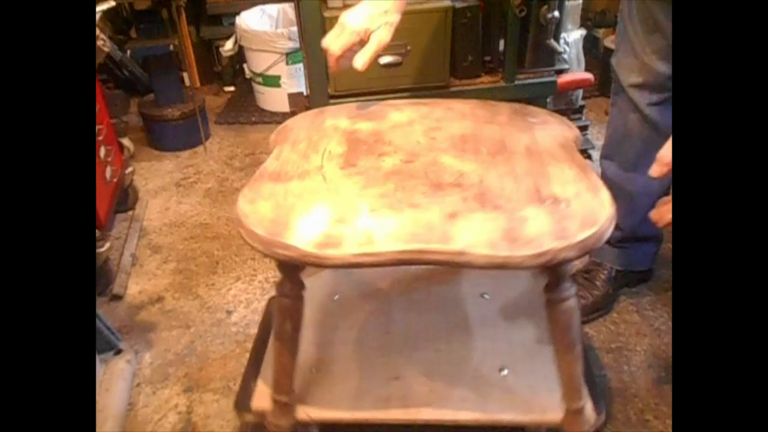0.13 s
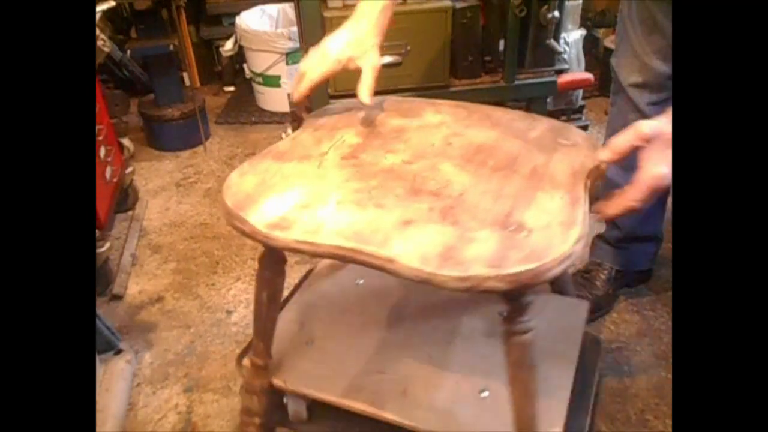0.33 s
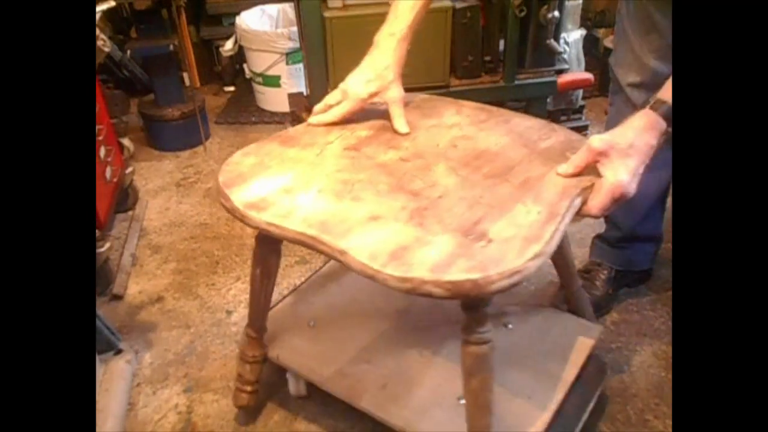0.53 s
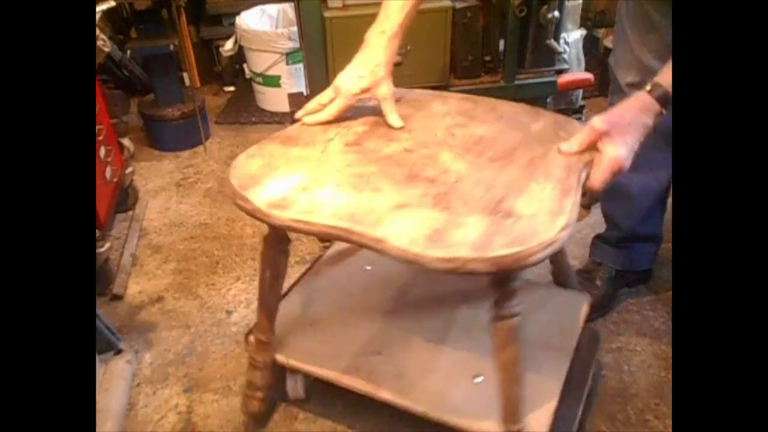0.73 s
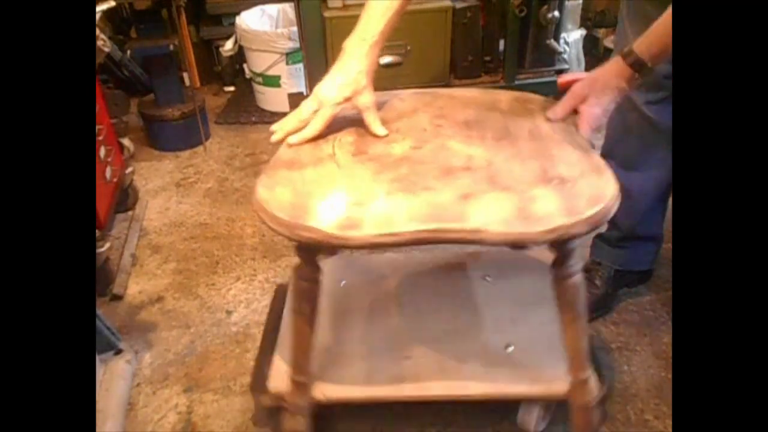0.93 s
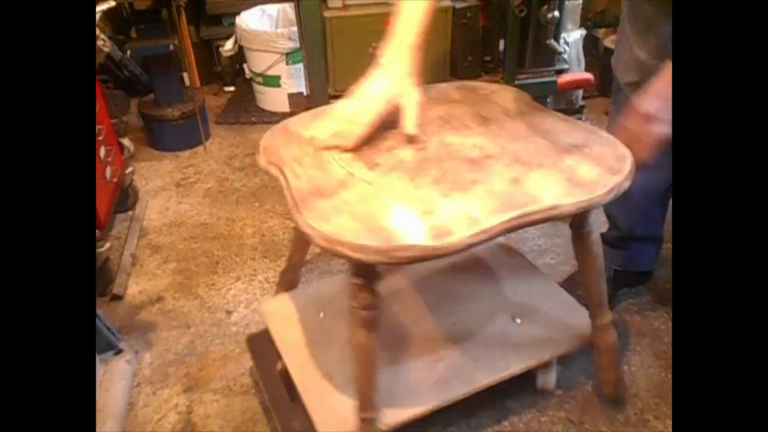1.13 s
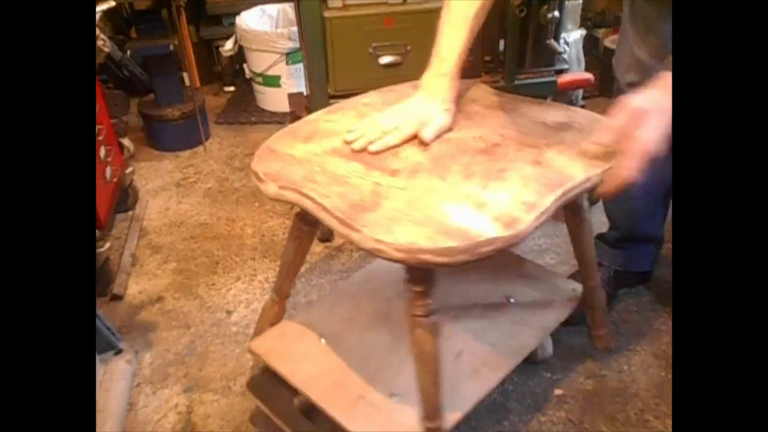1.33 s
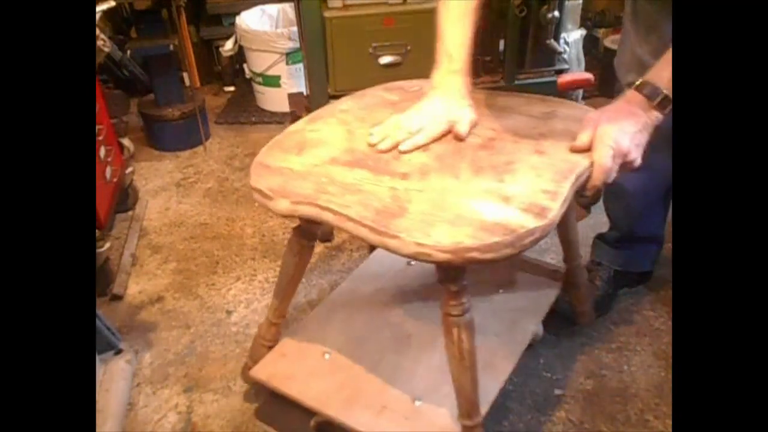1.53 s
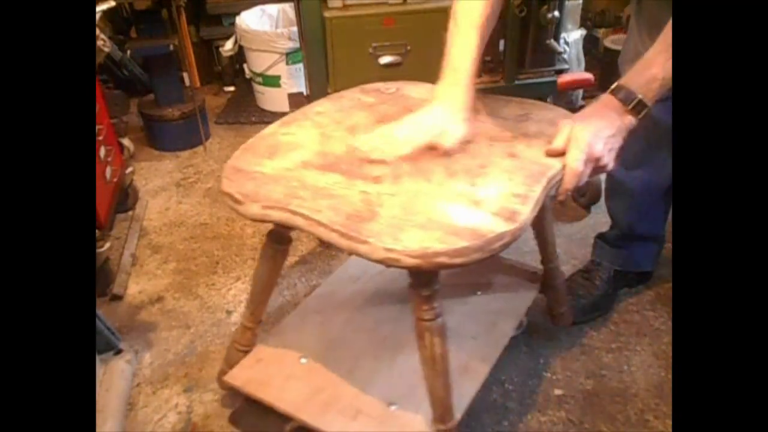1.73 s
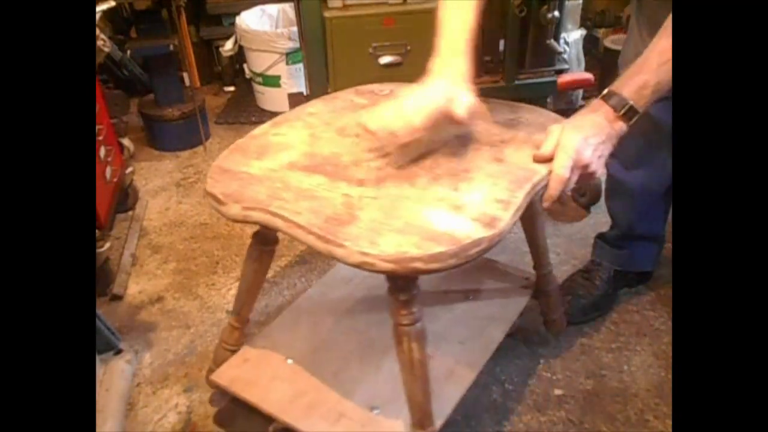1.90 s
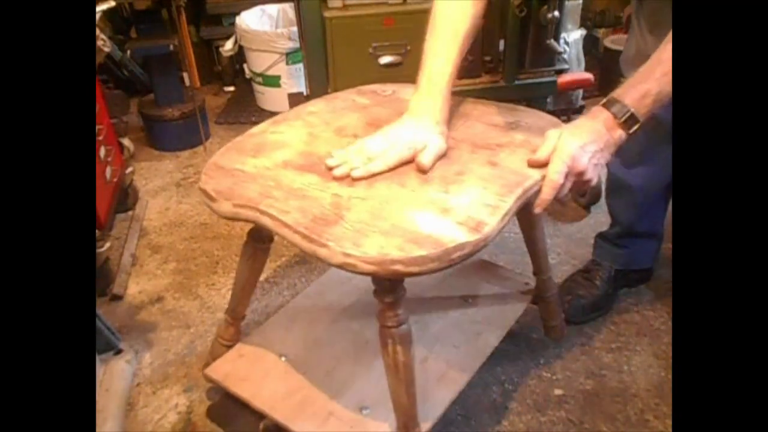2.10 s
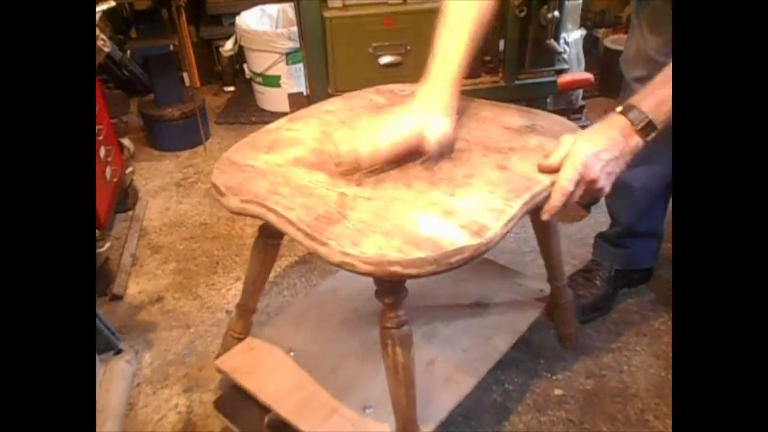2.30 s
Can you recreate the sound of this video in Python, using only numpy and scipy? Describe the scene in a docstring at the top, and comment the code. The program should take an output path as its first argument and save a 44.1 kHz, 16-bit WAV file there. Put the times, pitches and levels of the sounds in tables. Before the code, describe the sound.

A wooden trolley clatters on its casters over a gritty concrete floor, close to the microphone in a small workshop. The rolling dies away, a palm sweeps softly over a wooden seat, then lands with one sharp slap.

```python
"""Loose casters chatter over rough concrete, close by in a small workshop, on one microphone.
A wooden trolley with a chair seat on it is pushed to and fro: bumps and grit ring its casters and
board, and sand crackles under the wheels. As it comes to rest, a hand sweeps across the seat,
touches it and slaps it once; a fingernail ticks. Near walls answer briefly, over a low room tone."""
import sys
import numpy as np
from scipy import signal
from scipy.fft import rfft, irfft, next_fast_len
from scipy.io import wavfile
from scipy.ndimage import uniform_filter1d, minimum_filter1d

SR = 44100
rng = np.random.default_rng(int(sys.argv[2]) if len(sys.argv) > 2 else 0)


def unload_wav(signal):
    """Save mono or channel-first audio to the path in sys.argv[1] as 16-bit WAV at rate SR, clipped to [-1, 1]."""
    wavfile.write(
        sys.argv[1],
        SR,
        np.round(np.clip(np.atleast_2d(signal).T, -1, 1) * 32767).astype(np.int16),
    )


N = 103899
RING_N = 16384  # samples for one blow to die away
RING_T = np.arange(RING_N) / SR

# casters hit bumps: t/s, level/dB, bass/dB, treble/dB, chatter length/s
CASTER_BUMPS = [(.001, -20, 7, -4.5, 0.0033), (.023, -17.5, -1, -0.5, 0.0073), (.075, -19, -8, 5.5, 0.018),
                (.083, -19, 2.5, -2.5, 0.0033), (.132, -16, 5.5, 1.5, 0.0044), (.1535, -19.5, 0, 2, 0.0017),
                (.190, -18.5, -5, -1, 0.011), (.228, -20.5, 10.5, 6.5, 0.018), (.253, -23.5, 7, 5, 0.0082),
                (.298, -14.5, 3, -3, 0.0098), (.324, -22, 8, 7, 0.0047), (.336, -20.5, 5.5, 2, 0.0075),
                (.350, -22.5, -10, -1, 0.0031), (.409, -32.5, 6.5, -8, 0.0055),
                (.420, -17.5, -5, 4.5, 0.0045), (.454, -23, 5, -2, 0.0053), (.474, -24.5, -5, -2, 0.0052),
                (.518, -25, 8, 3, 0.01), (.5415, -17, -1, -2.5, 0.0043), (.596, -24.5, 0, -10, 0.0047),
                (.621, -21, 3.5, -0.5, 0.01), (.693, -24, 5.5, 4, 0.003), (.700, -19.5, -11, 3, 0.0048),
                (.724, -17, 4, 2.5, 0.015), (.7995, -24, 6, 3, 0.0044), (.83, -29, 11, 12, 0.0069),
                (.916, -18, 5.5, -2, 0.034), (.931, -23.5, 2, 9, 0.0067), (.949, -28, -26, 13, 0.0048),
                (.957, -12, -0.5, 11.5, 0.0078), (.993, -20.5, -4, 13, 0.0062),
                (1.012, -16.5, 5, 3.5, 0.0071), (1.0395, -12.5, -25, 2.5, 0.001),
                (1.062, -3, -36, 1.5, 0.0096), (1.092, -18, -3, -17, 0.0062), (1.113, -12.5, -4, 5, 0.0047),
                (1.134, -19.5, 12, 7, 0.013), (1.174, -17.5, 10, 0.5, 0.0024),
                (1.204, -18.5, 7.5, 1, 0.011), (1.265, -27, -8, -1, .005), (1.3915, -14, -2.5, 7.5, 0.0047),
                (1.483, -22, 5, -14, 0.0095), (1.545, -26.5, -7, -2, 0.0037), (1.553, -27, -10, 0, 0.0026),
                (1.659, -20.5, 1, 2, 0.015), (1.884, -45, 8, -13, 0.003), (1.902, -52, 0, -3, 0.0033),
                (2.041, -45.5, 9, -2, 0.0066), (2.263, -46.5, 15, -9, 0.012), (2.299, -37, 11, -16, 0.0035)]
# rolling noise, following speed and load: t/s, level/dB
ROLL_LEVEL = [(0, -22), (.2, -31.5), (.36, -26), (.5, -40), (.58, -31.5), (.68, -40), (.76, -37),
              (.79, -40.5), (.88, -27), (.96, -22), (1.12, -22.5), (1.22, -29.5), (1.3, -36), (1.38, -42),
              (1.6, -58), (1.7, -32), (1.8, -46.5), (1.94, -59), (2.28, -59), (2.32, -49), (2.36, -40.5)]
# ring of casters and board: f/Hz, level/dB, t60/s
TROLLEY_MODES = [(129.6, -14, 0.23), (183, -16, 0.51), (786.7, -1.5, 0.47), (945, 0.5, 0.24),
                 (1142, -5.5, 0.3), (1255, 11.5, 0.066), (1330, 6, 0.25), (1492, 9, 0.15), (1806, 8, 0.24),
                 (2040, 11.5, 0.091), (2670, 7, 0.097), (2890, 0.5, 0.29), (3395, -4, 0.19),
                 (4017, -0.5, 0.083)]
# tone of a bump: f/Hz, level/dB
BUMP_TONE = [(40, -43), (90, -22.5), (125, -23), (250, -16), (480, -6.5), (720, 0.5), (1000, -2),
             (1400, 5.5), (2000, 1.5), (2500, -0.5), (4000, -6), (5200, -12), (10000, -21)]
# tone of the grit: f/Hz, level/dB
GRIT_TONE = [(40, -14), (85, -11), (120, -8), (155, -14), (190, -3.5), (245, -12.5), (310, 0), (500, -1.5),
             (950, 2.5), (1400, 7), (2000, -8.5), (2600, -1.5), (4000, -5), (5200, -16.5), (10000, -30.5)]
# tone of crushed sand: f/Hz, level/dB
SAND_TONE = [(300, -17), (1500, -22), (3500, -31), (6000, 14.5), (10000, -1.5)]
# the hand lands on the seat: t/s, level/dB, bass/dB, treble/dB, contact length/s
HAND_BLOWS = [(1.992, -31.5, -11.5, -6.5, 0.006), (2.0865, -1.5, -3, -2.5, 0.0044)]
# ring of the seat: f/Hz, level/dB, t60/s
SEAT_MODES = [(124, -7.5, .2), (181, -1.5, 0.15), (495, -10, .16), (573, -4.5, 0.13), (788, 5.5, 0.2),
              (1087, 5.5, 0.049), (1312, -4, 0.21), (1363, 6.5, 0.25), (1790, 3, 0.17), (2690, -10, 0.24),
              (2895, -4, 0.114), (3700, -3, 0.027), (7700, 10, 0.11)]
# tone of the slap: f/Hz, level/dB
SLAP_TONE = [(50, -45), (110, -14), (150, -10), (188, -10), (270, -12.5), (550, -2), (800, -9), (1150, 3.5),
             (1550, -3.5), (2000, -4), (3500, 0), (5500, -3.5), (7500, -2.5), (10500, -9.5)]
# the palm sweeps over the wood: t/s, level/dB
SWEEP_LEVEL = [(1.37, -45.5), (1.42, -35), (1.49, -32.5), (1.57, -44), (1.63, -36.5), (1.71, -33),
               (1.79, -27), (1.83, -34.5), (1.87, -46.5), (1.94, -56.5), (2.05, -53), (2.1, -59.5)]
# tone of skin on wood: f/Hz, level/dB
SWEEP_TONE = [(100, -26), (400, 0.5), (1500, -1), (2600, 0), (4200, 6.5), (6000, 2.5), (8000, 3),
              (10500, -1)]
# tone of the fingernail and of the room's air: f/Hz, level/dB
NAIL_TONE = [(2000, -18), (6500, -10), (7900, 0), (10500, -8)]
AIR_TONE = [(20, 10), (40, 20.5), (80, 2), (150, -6.5), (300, -13), (1400, -19),
            (3000, -103), (10000, -72)]
# decay of the workshop: f/Hz, t60/s
WORKSHOP_DECAY = [(100, 0.11), (500, 0.28), (1500, 0.11), (4000, 0.17), (10000, 0.13)]


def caster_bumps():
    """Loose casters chatter as they drop into pits in the concrete."""
    return blows(CASTER_BUMPS, TROLLEY_MODES, BUMP_TONE, ring_db=-6.5, room_db=-4.5,
                 attack_s=0.00071, release_s=0.0037, uneven_db=1.0, push_db=-27.5, span_s=0.016)


def rolling_wheels():
    """Wheels rumble over the rough floor, which rings the trolley, and crush loose sand."""
    grit = floor_grains(per_s=2500, spread_db=0)
    rumble = signal.fftconvolve(grit, contact_sound(TROLLEY_MODES, GRIT_TONE, ring_db=-5.5, room_db=-2))
    crack = click_in_room(decay_s=0.0012, room_db=-8, build_s=0.0034)
    sand = signal.fftconvolve(floor_grains(per_s=460, spread_db=12.5), unit(colour(crack, SAND_TONE)))
    return (rumble + undb(-19.5) * sand)[:N]


def floor_grains(per_s, spread_db):
    """Random impulses under the wheels, as strong as the rolling; spread makes a few stand out."""
    sizes = rng.choice([-1, 1], N) * undb(spread_db * np.minimum(rng.exponential(size=N), 3))
    struck = rng.random(N) < per_s / SR
    return unit(struck * sizes) * np.sqrt(N) * curve(ROLL_LEVEL)


def hand_slap():
    """The flat hand touches the seat, then cracks down on it; the seat thumps and rings."""
    return blows(HAND_BLOWS, SEAT_MODES, SLAP_TONE, ring_db=-10, room_db=-6,
                 attack_s=0.00075, release_s=0.0039, uneven_db=1.7, push_db=-18.5, span_s=0.014)


def blows(table, modes, tone, ring_db, room_db, attack_s, release_s, uneven_db, push_db, span_s):
    """Each blow is a soft push plus a burst of tiny contacts; its level is its energy over span_s."""
    out = np.zeros(N)
    push = unit(np.sin(np.pi * np.minimum(RING_T / 0.0027, 1)))  # a 2.7 ms half sine: the thump
    for start_s, db, bass_db, treble_db, length_s in table:
        envelope = np.minimum(RING_T / attack_s, 1)
        envelope *= np.exp(-np.maximum(RING_T - length_s, 0) / release_s)
        contacts = unit(even_noise(RING_N) * envelope * undb(uneven_db * wobble(RING_N, hold=64)))
        force = contacts + undb(push_db) * push
        hit = signal.fftconvolve(force, contact_sound(modes, tone, ring_db, room_db))[:RING_N]
        hit = colour(hit, [(400, bass_db), (1200, 0), (2000, 0), (6000, treble_db)])
        add(out, start_s, unit(hit) * undb(db) * np.sqrt(span_s * SR))
    return out


def contact_sound(modes, tone, ring_db, room_db):
    """One contact at the microphone: a click, the room's answer and the ringing modes."""
    click = signal.unit_impulse(RING_N) + undb(room_db) * wall_echoes(build_s=0.0045)
    hz, db, t60 = np.array(modes).T[:, :, None]
    scatter_db = 1.5 * rng.standard_normal(db.shape)  # each blow lands elsewhere, favouring other modes
    partials = undb(db + scatter_db) * np.sin(2 * np.pi * (hz * RING_T + rng.random(hz.shape)))
    ring = np.sum(partials * decay(t60), axis=0)
    return unit(unit(colour(click, tone)) + undb(ring_db) * unit(ring))


def palm_sweep():
    """Dry skin hisses over the wood, a little grainy."""
    friction = even_noise(N) * undb(1.85 * wobble(N, hold=200))
    return unit(colour(friction, SWEEP_TONE)) * np.sqrt(N) * curve(SWEEP_LEVEL)


def nail_tick(start_s=2.2535, db=-42.5, span_s=0.014):
    """A fingernail meets the seat with one thin click."""
    click = colour(click_in_room(decay_s=0.001, room_db=3, build_s=0.0019), NAIL_TONE)
    out = np.zeros(N)
    add(out, start_s, unit(click) * undb(db) * np.sqrt(span_s * SR))
    return out


def click_in_room(decay_s, room_db, build_s):
    """A tiny burst of noise, heard direct and off the walls."""
    direct = unit(even_noise(RING_N) * np.exp(-RING_T / decay_s))
    return direct + undb(room_db) * wall_echoes(build_s)


def wall_echoes(build_s):
    """Dense echoes off near walls: they build up, then each band dies at its own rate."""
    centres = np.geomspace(100, 10000, 5)
    spectrum, f = rfft(even_noise(RING_N)), np.fft.rfftfreq(RING_N, 1 / SR)
    tail = 0
    for hz, weights in zip(centres, np.eye(len(centres))):
        band = irfft(spectrum * on_log(f, list(zip(centres, weights))))
        tail += band * decay(on_log(hz, WORKSHOP_DECAY))
    return unit(tail * (1 - np.exp(-RING_T / build_s)))


def room_tone(db=-62):
    """The workshop's air: a faint, low rumble behind everything."""
    return unit(colour(even_noise(N), AIR_TONE)) * np.sqrt(N) * undb(db)


def undb(db):
    """Decibels to gain."""
    return 10 ** (np.asarray(db) / 20)


def unit(x):
    """Scale to an energy of one."""
    return x / np.sqrt(np.sum(x ** 2) + 1e-18)


def decay(t60):
    """A fall of 60 dB every t60 seconds."""
    return np.exp(-np.log(1000) * RING_T / t60)


def curve(table):
    """Gain over time from (t/s, level/dB) points."""
    return undb(np.interp(np.arange(N) / SR, *np.array(table).T))


def on_log(hz, table):
    """Read (f/Hz, value) points on a log-frequency axis."""
    f, values = np.array(table).T
    return np.interp(np.log(hz + 1e-3), np.log(f), values)


def colour(x, table):
    """Minimum-phase filter through (f/Hz, level/dB) points."""
    n = 2 * next_fast_len(len(x))
    gain = undb(on_log(np.fft.rfftfreq(n, 1 / SR), table))
    cepstrum = irfft(np.log(gain))
    cepstrum[1:n // 2] *= 2
    cepstrum[n // 2 + 1:] = 0
    return irfft(rfft(x, n) * np.exp(rfft(cepstrum)))[:len(x)]


def add(out, start_s, x):
    """Mix a sound in at a time."""
    i = int(start_s * SR)
    out[i:i + len(x)] += x[:N - i]


def even_noise(size):
    """Noise with random phases and a flat spectrum."""
    return irfft(np.exp(2j * np.pi * rng.random(size // 2 + 1)), size) * np.sqrt(size)


def wobble(count, hold):
    """A random wobble with a spread of one, held for about `hold` samples."""
    return unit(uniform_filter1d(rng.standard_normal(count), hold)) * np.sqrt(count)


def top_cut(x):
    """Steep low-pass at 10750 Hz."""
    taps = signal.firwin(131, 10750, window=("kaiser", 11), fs=SR)
    return signal.fftconvolve(x, taps[None], mode="same")


def scene():
    """Trolley, hand and workshop air as they reach the microphone, in mono."""
    air = room_tone()
    trolley = caster_bumps() + rolling_wheels()
    hand = hand_slap() + palm_sweep() + nail_tick()
    return (trolley + hand + air)[None]


def record(dry):
    """Behind the microphone, a fast limiter holds down the loudest peaks; the top is cut steeply."""
    ceiling, window = 0.95, int(0.0015 * SR)
    heard = top_cut(dry)
    gain = minimum_filter1d(ceiling / np.maximum(np.abs(heard), ceiling), window)
    return top_cut(heard * uniform_filter1d(gain, window))


dry = scene()
out = record(dry)
unload_wav(out)
```